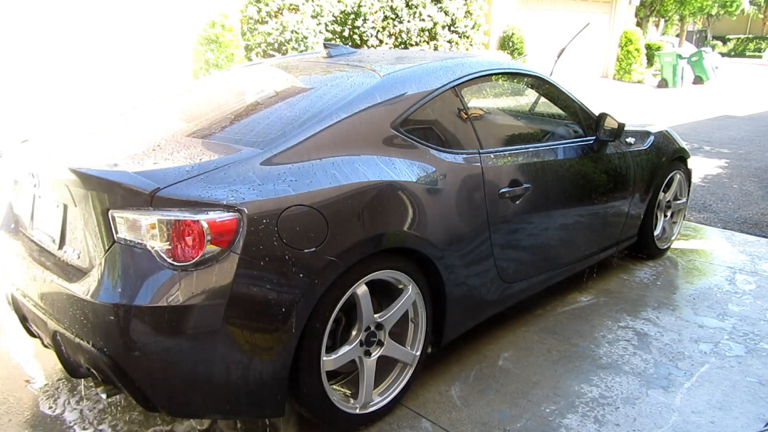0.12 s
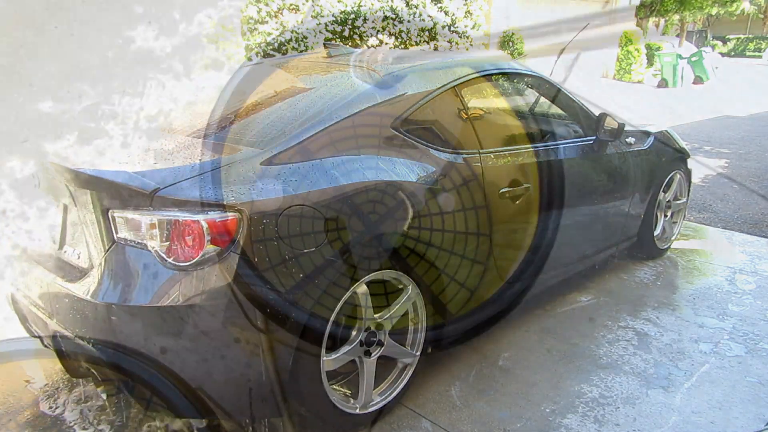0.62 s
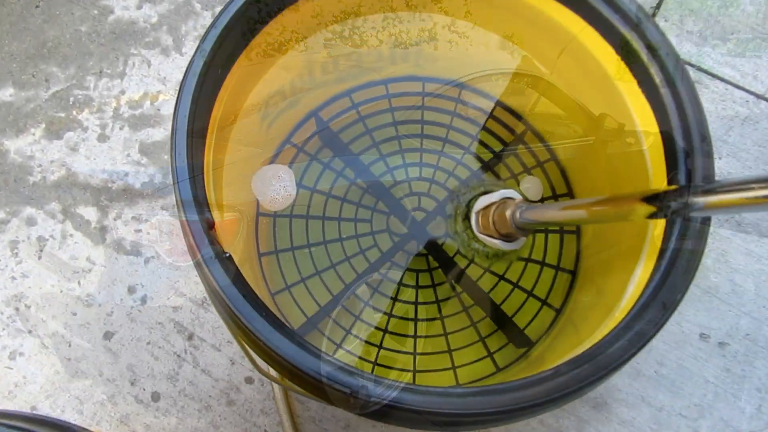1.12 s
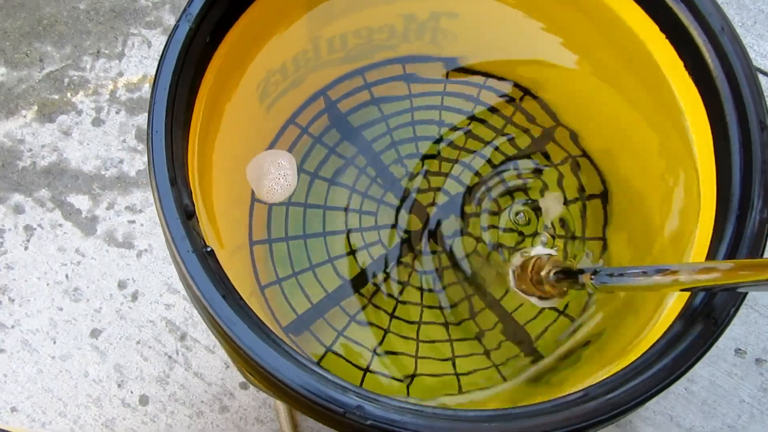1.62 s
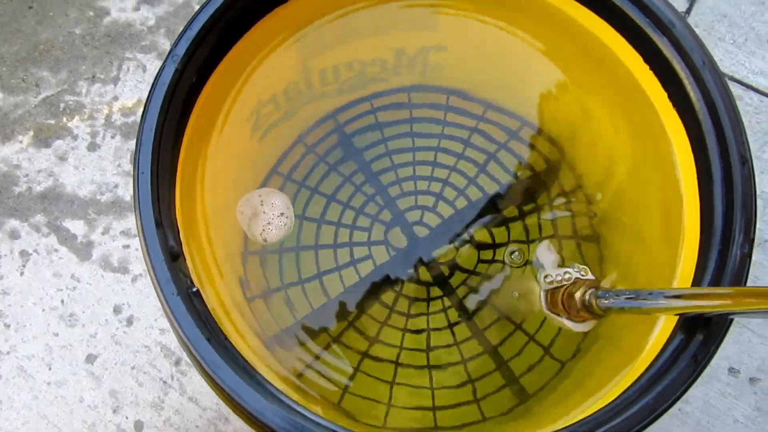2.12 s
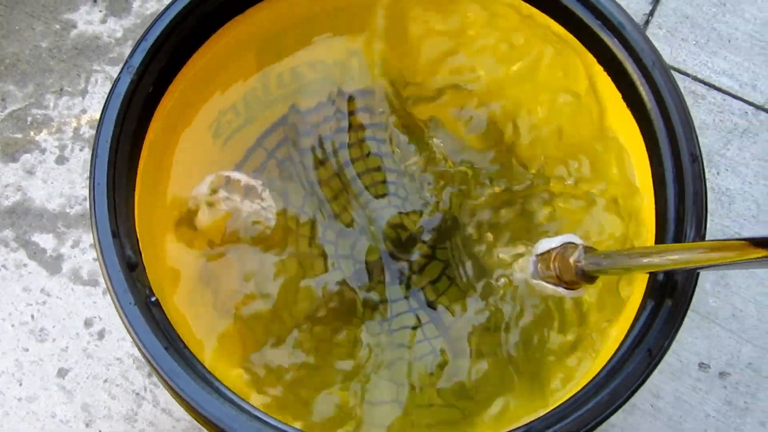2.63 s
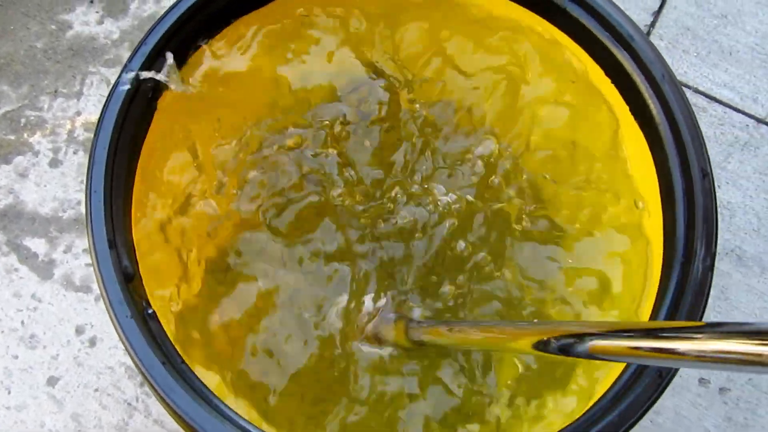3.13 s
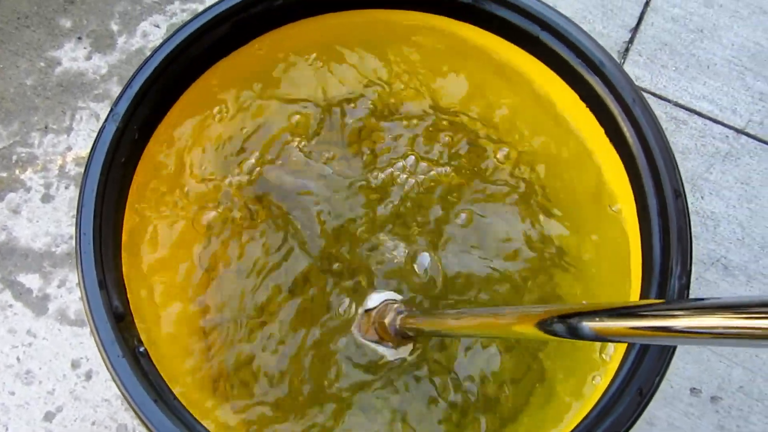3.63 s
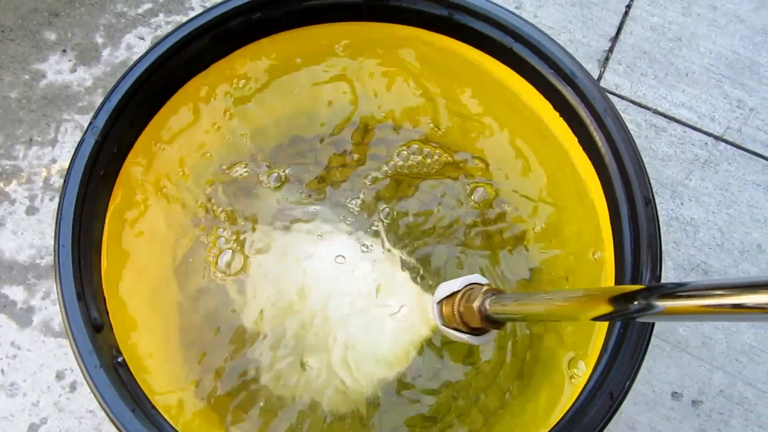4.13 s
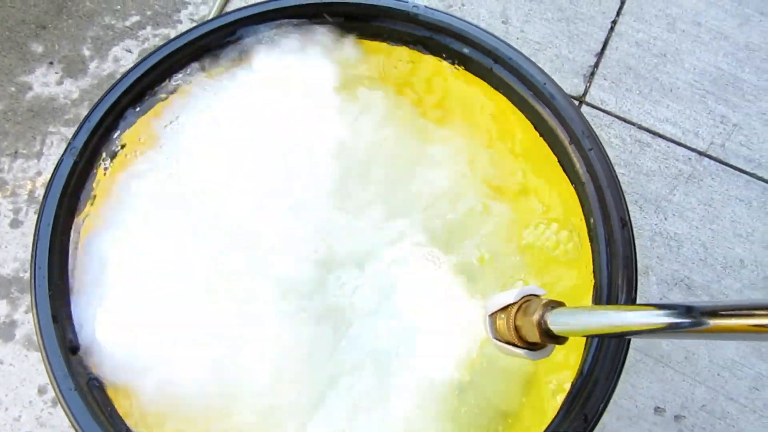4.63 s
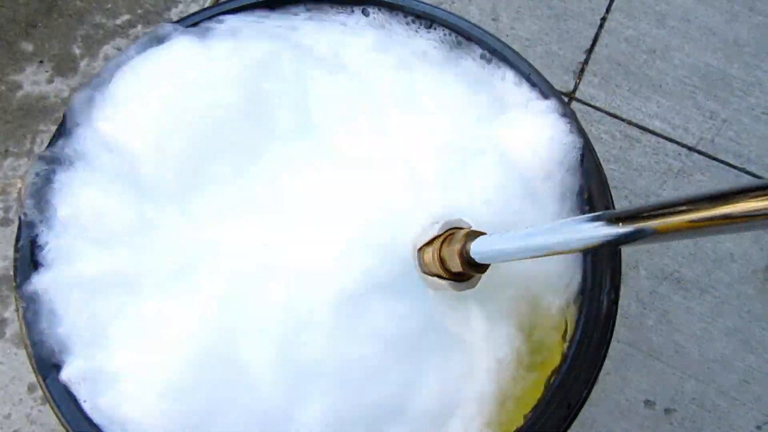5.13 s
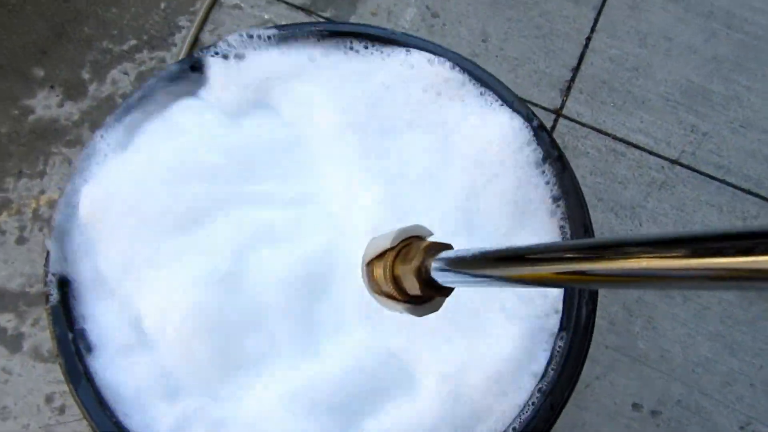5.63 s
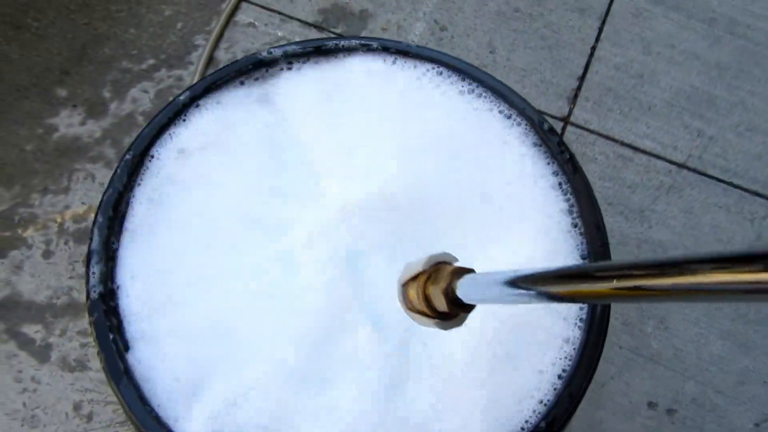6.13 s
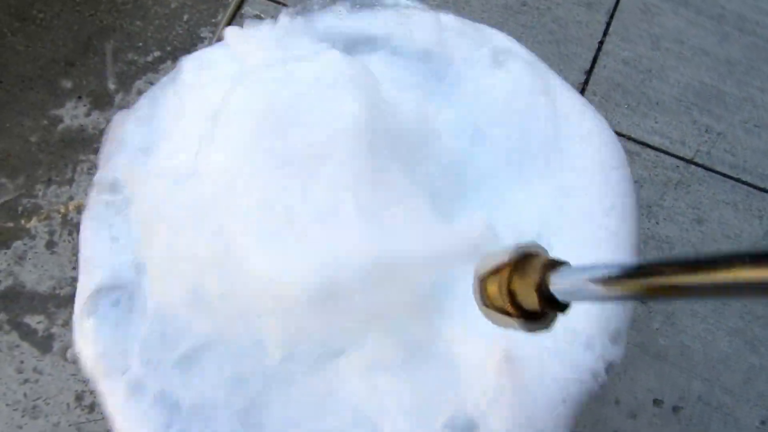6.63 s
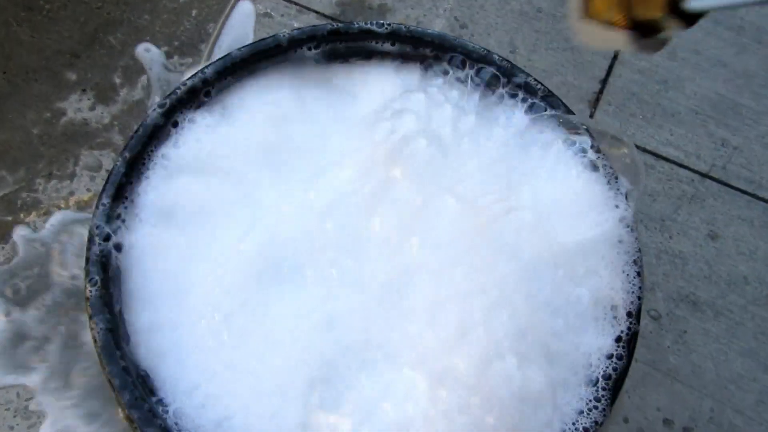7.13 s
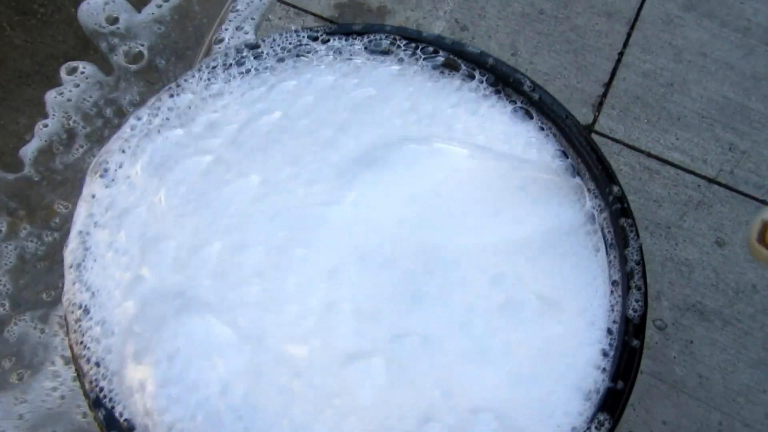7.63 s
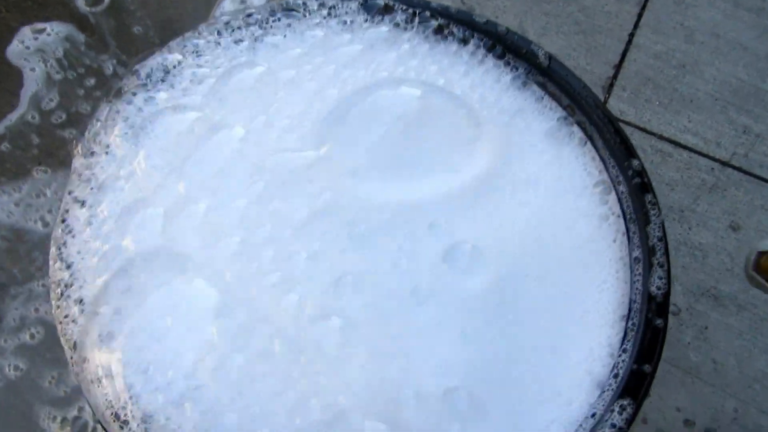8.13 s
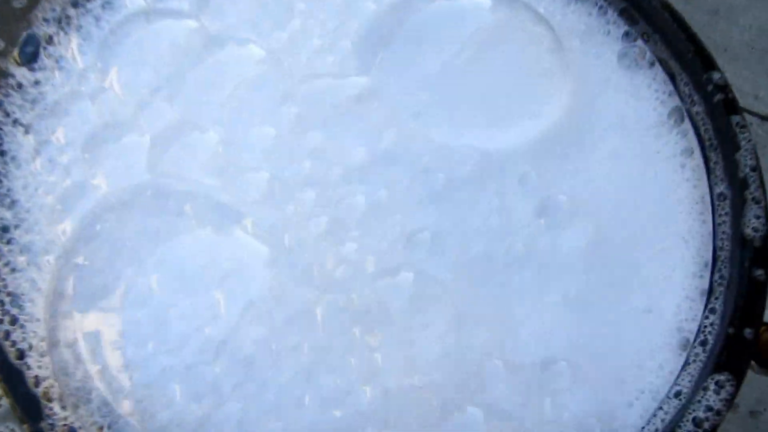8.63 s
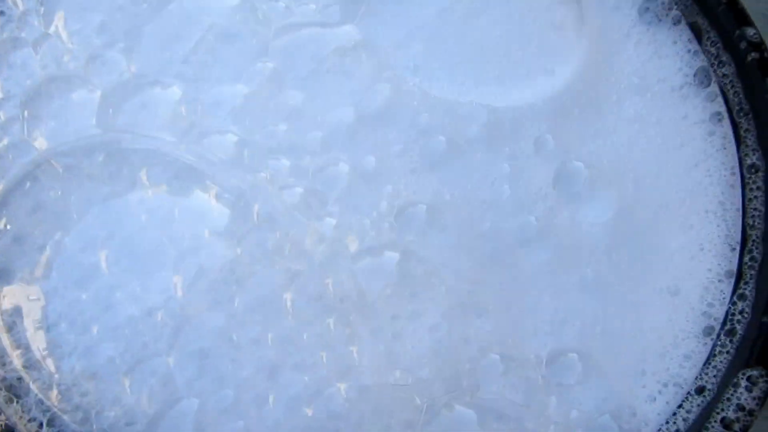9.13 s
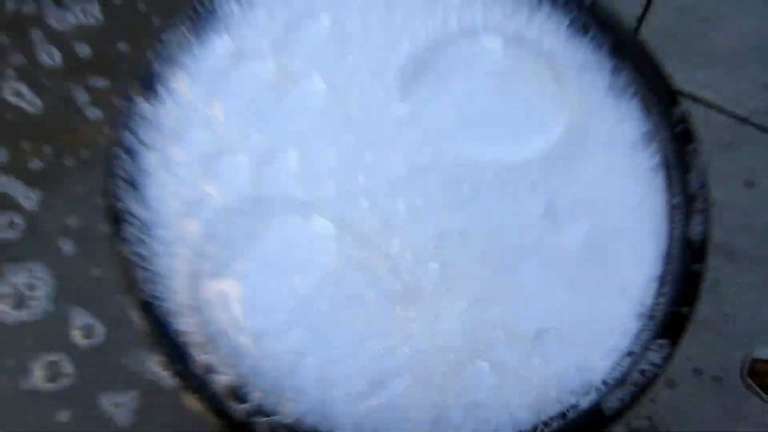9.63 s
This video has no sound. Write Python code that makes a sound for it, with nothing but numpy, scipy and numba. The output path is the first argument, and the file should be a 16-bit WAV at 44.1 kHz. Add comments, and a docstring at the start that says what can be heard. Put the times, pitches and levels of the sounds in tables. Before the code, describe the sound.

Close outdoors, a pressure washer jet churns and splashes in a bucket in short bursts, motor whine sliding lower between, ending in faint foam crackle.

```python
"""An electric pressure washer heard close on a paved yard: a first wash fades out, then the lance fires bursts
into a soapy bucket. Pump strokes ring the casing and gear teeth whine; after each burst the motor coasts down
and the whine slides lower. The jet is shaped noise, combed by its echo off the water. Knocks on the microphone,
popping foam (short damped rings and filtered clicks) and a humming suburban background fill the gaps."""
import sys
import numpy as np
from scipy import signal
from scipy.fft import rfft, irfft
from scipy.io import wavfile
from scipy.ndimage import uniform_filter1d, map_coordinates
from numba import njit

SR = 44100
rng = np.random.default_rng(int(sys.argv[2]) if len(sys.argv) > 2 else 0)


def magnitude_from_level(level_db):
    """Linear magnitude for a level in decibels (20 dB per decade)."""
    exponent = np.asarray(level_db, float) / 20
    return 10 ** exponent


def digitize_waveform(pressure):
    """Quantize a signal to 16-bit integers and store it at the path in sys.argv[1].

    Rows of a 2-D input are taken as channels; values are limited to [-1, 1].
    """
    field = np.atleast_2d(pressure).T
    bounded = np.clip(field, -1, 1)
    quanta = np.round(bounded * 32767).astype(np.int16)
    wavfile.write(sys.argv[1], SR, quanta)


N = 430857
T = np.arange(N) / SR  # time in s

# Casing resonances: pitch_hz, width_hz, relative_db
CASING = [(243.7, 66, -8.5), (337, 19, -1.5), (432.4, 42, 1.5), (581, 37, -2.5), (700, 112, -7),
          (966, 160, -7.5), (1460, 200, -16.5), (1990, 140, -26), (2774, 190, -14), (5460, 190, -13),
          (7240, 820, -23), (11030, 740, -42)]
# Gear whine: multiple of the tooth rate, relative_db
GEAR_TONES = [(1, 1), (2, .5), (3, -8), (4, -9), (5, -11), (6, -15)]
# Panels the gear whine rings most: pitch_hz, width_hz, relative_db
GEAR_PANELS = [(600, 100, -2), (2790, 200, -9), (5400, 260, -6)]
# Panel that sings when a hum tone sags onto it: pitch_hz, width_hz, relative_db
HUM_PANEL = [(432, 22, 11)]
# Stroke-rate multiples from the fifth up, in the first wash: relative_db
WASH_STROKES = [-39, -33, -33, -29, -34, -36, -41, -41, -36, -36, -44, -41, -40, -48, -38, -39, -41]
# The same multiples under load at the bucket: relative_db
LOAD_STROKES = [-6, 0, 0, -11, -9, -6, -9, -3, -4, -11, -5]
# Clean gear lines of the first wash: pitch_hz, relative_db
WASH_WHINE = [(1340, -30.5), (2686, -35.5), (2789, -34.5), (5313, -31)]
# Spray colour in the first wash: pitch_hz, relative_db (per Hz)
WASH_SPRAY = [(35, -50), (60, -15), (160, -17), (400, -2.5), (591, -6.5), (1360, -7.5), (2360, -11.5),
              (3750, -14), (5430, -13), (15000, -19)]
# Motor runs: power_on_s, power_off_s, whirr_db, load_hum_db
RUNS = [(1.376, 2.87, -31, -38.5), (3.635, 5.283, -35.5, -42), (6.247, 6.8, -29.5, -42)]
# Speed of each run: share of the usual speed
RUN_SPEED = [1, 1, .975]
# Usual spin-up, then a sag as pressure builds: after_start_s, strokes_hz
SPIN_UP = [(0, 32), (.09, 52), (.27, 52.5), (.43, 56.3), (.57, 56.9), (.74, 56.7), (.9, 55.7), (1.4, 54.6),
           (1.65, 54.3)]
# Jet stages, the third from when the nozzle breaks the surface:
# start_s, end_s, echo strength (0-1), splash_db (against the underwater part of the jet)
JET_STAGES = [(1.351, 2.809, .62, -6), (3.551, 4.002, .55, -9), (4.002, 5.224, .15, -5),
              (6.211, 6.671, .1, -4)]
# Lance within each stage: time_s, jet_db, share spraying in air (0-1), churning (about 1 is full)
LANCE = [
    [(1.376, -22, 0.53, 0), (1.385, -27.5, 0.44, 0.9), (1.47, -22.5, 0.7, 0.6), (1.6, -15.5, 0.43, 1.1),
     (1.76, -18, 0.12, 0.6), (1.9, -15.5, 0.25, 0.15), (2.2, -17.5, 0.09, 0.1), (2.23, -21.5, 0.1, 0),
     (2.5, -17.5, 0.11, 0), (2.8, -17, 0.03, 0.03)],
    [(3.56, -27.5, 0.47, 0), (3.62, -32.5, 0.47, 0.07), (3.75, -25, 0.2, 0.1), (3.81, -23.5, 0.16, 0.38),
     (3.98, -19, 0.02, 0.47)],
    [(4.01, -10.5, 0.94, 0.04), (4.12, -12.5, 0.99, 0.06), (4.18, -20.5, 0.8, 0.14),
     (4.26, -22.5, 0.67, 0.33), (4.57, -17.5, 0.73, 0.3), (4.74, -17.5, 0.5, 0.6), (4.85, -13.5, 0.41, 0.2),
     (4.98, -20, 0.26, 0.27), (5.03, -17, 0.82, 0), (5.08, -17.5, 0.78, 0.24), (5.16, -13, 0.9, 0.14),
     (5.22, -16.5, 0.91, 0.01)],
    [(6.22, -26, 0.56, 0.05), (6.27, -31, 0.48, 0.19), (6.44, -23.5, 0.53, 0.1), (6.66, -17.5, 0.39, 0.5)],
]
# Extra path of the echo off the water as the nozzle moves: time_s, path_cm
DETOUR = [(1.35, 13.6), (1.7, 13), (2.05, 13.6), (2.3, 15.4), (2.6, 16.3), (2.81, 16.5), (3.55, 8.6),
          (3.72, 9.9), (3.82, 11.7), (4.0, 13.2), (4.02, 7), (4.75, 7), (4.95, 8.3), (5.22, 6.5)]
# Bucket resonances: pitch_hz, width_hz, relative_db
BUCKET = [(978, 370, -0.5), (1139, 53, 13), (1590, 178, 8.5), (1764, 250, 6), (2260, 45, 4.5),
          (2670, 49, 1), (2770, 380, 1.5)]
# Air pockets dragged under by the jet: start_s, end_s, from_hz, to_hz, level_db
POCKETS = [(1.46, 1.83, 9900, 8000, -23), (1.41, 1.71, 458, 420, -21), (1.8, 1.9, 1670, 1660, -30),
           (1.52, 2.08, 1234, 1140, -27.5), (1.8, 2.6, 6700, 4850, -27), (2.05, 2.92, 3700, 3180, -25),
           (2.6, 2.9, 5000, 6000, -26.5), (3.68, 4.02, 5300, 3800, -22), (3.72, 3.87, 2280, 2250, -23.5),
           (3.777, 4.08, 1940, 1850, -17.5), (3.814, 4.08, 2720, 2240, -17.5),
           (4.784, 4.97, 2150, 2030, -23), (4.764, 4.95, 3500, 3100, -30), (4.66, 4.82, 445, 415, -27)]
# Valve and surface cracks: start_s, level_db
SNAPS = [(1.3525, 1.5), (3.552, -16.5), (4.0037, -8), (6.2114, -9)]
# Large bubbles ringing: start_s, level_db, pitch_hz
GULPS = [(2.735, -14, 937), (2.76, -15, 1010), (8.43, -44, 1130)]
# Foam and drip ticks: start_s, level_db, pitch_hz
TICKS = [(1.288, -32, 5270), (1.3, -28, 9000), (1.308, -24, 5750), (1.334, -33, 7960), (2.955, -34, 9500),
         (3.1496, -35, 11000), (3.2469, -36, 10500), (3.277, -40, 3900), (6.0605, -50, 6360),
         (6.096, -48, 4630), (7.2083, -32, 5460), (7.613, -46, 5600), (8.8059, -47.5, 7870)]
# Hand knocks on the microphone: start_s, level_db, pitch_hz
KNOCKS = [(1.219, -22, 95.5), (1.251, -18, 75), (1.28, -14.5, 126), (7.561, -39, 57), (7.627, -31, 83.5),
          (7.794, -35, 84.5)]
# Background colour: pitch_hz, relative_db (per Hz)
YARD = [(15, -39), (25, -6), (121, -3.5), (354, -10), (573, -10), (709, -14.5), (1120, -17), (2180, -20.5),
        (2430, -23.5), (3090, -29), (15000, -46)]
# Narrow background drones: pitch_hz, width_hz, relative_db
YARD_DRONES = [(567, 7, -14), (1070, 30, -25.5), (2014, 25, -21), (2462, 35, -15)]
# Background level over time: time_s, level_db
YARD_LEVEL = [(0, -44.5), (1.3, -36.5), (1.9, -46.5), (3.5, -52), (6.099, -55.5), (7.0, -47), (8.2, -49.5),
              (9.2, -44.5), (9.77, -41.5)]

WASH_STROKE_HZ = 53.83
WASH_DB, WASH_SWELL_DB = -15.5, -1.5  # level, and how far from it the wash begins
FADE_FROM_S, FADE_TO_S, FADE_POWER = 0.28, 1.289, 0.78
TEETH = 49.9  # gear tooth contacts per pump stroke
COAST_S = .55  # time constant of the coast-down
BITE_S = 0.093  # time from power on to full voice
STALL, STALL_RAMP = 0.081, 0.034  # shares of full speed: silent below the first, fading in over the second
CHURN_DB, SLOSH_DB = -22.5, -30.5  # full churning, and the splash from it
POCKET_Q = 12.  # final pitch over width
HUM_HZ, HUM_DB = 117.8, -4.5  # background hum: middle pitch, and level against the background


@njit
def svf(x, hz, width):
    """State-variable band-pass with a moving centre, gain 1 at the centre."""
    y, b, l = np.empty(len(x)), 0., 0.
    for i in range(len(x)):
        g, k = np.tan(np.pi * hz[i] / SR), width / hz[i]
        v = (b + g * (x[i] - l)) / (1 + g * (g + k))
        b, l, y[i] = 2 * v - b, l + 2 * g * v, k * v
    return y


def band(x, lo_hz, hi_hz):
    """Band-pass."""
    return signal.sosfilt(signal.butter(2, [lo_hz, hi_hz], "bandpass", fs=SR, output="sos"), x)


def rings(x, modes):
    """Sum of fixed resonances (pitch_hz, width_hz, level_db), neighbours in opposite phase."""
    out = 0
    for k, (hz, width, db) in enumerate(modes):
        out = out + (-1) ** k * magnitude_from_level(db) * signal.lfilter(*signal.iirpeak(hz, hz / width, SR), x)
    return out


def unit(x):
    """Scale to rms 1."""
    return x / np.std(x)


def walk(rate):
    """Random levels drawn rate times a second, smoothed twice; spread near 1."""
    k = int(SR / rate)
    held = np.repeat(rng.standard_normal(N // k + 1), k)
    return 1.51 * uniform_filter1d(uniform_filter1d(held, k), k)[:N]


def coloured(spectrum):
    """Noise of rms 1 shaped by (pitch_hz, level_db) points."""
    hz, db = np.transpose(spectrum)
    f = np.arange(N // 2 + 1) * SR / N + 1
    shape = magnitude_from_level(np.interp(np.log(f), np.log(hz), db))
    return unit(irfft(rfft(rng.standard_normal(N)) * shape, N))


def droplets(spread_db):
    """Noise whose samples scatter widely in size, like many small impacts."""
    return rng.standard_normal(N) * magnitude_from_level(spread_db * np.minimum(rng.exponential(size=N), 6))


def pump(hz, scatter_db):
    """Pump phase in turns, and one blow per stroke ringing the casing; rms near 1 at the first wash's rate."""
    turns = np.cumsum(hz) / SR
    whole = turns.astype(int)
    size = magnitude_from_level(scatter_db * rng.standard_normal(N // 200))
    one_blow = rings(signal.unit_impulse(SR), CASING)
    blows = rings(np.diff(whole, prepend=0) * size[whole], CASING)
    return turns, blows / np.sqrt(WASH_STROKE_HZ * np.mean(one_blow ** 2))


def strokes(turns, levels_db):
    """Clean hum of the pump: multiples of the stroke rate from the fifth up, each wavering a little."""
    out = np.zeros(N)
    for k, db in enumerate(levels_db):
        tone = np.sin(2 * np.pi * ((5 + k) * turns + rng.random()))
        out += np.sqrt(2) * magnitude_from_level(db + 1.5 * walk(8)) * tone
    return out


def first_wash():
    """Steady pump strokes in the casing, clean gear lines and a broad spray, swelling a little, then fading."""
    left = np.clip((FADE_TO_S - T) / (FADE_TO_S - FADE_FROM_S), 0, 1)
    swell_db = WASH_SWELL_DB * np.clip(1 - T / FADE_FROM_S, 0, 1)
    turns, blows = pump(np.full(N, WASH_STROKE_HZ), 0.27)
    whine = np.zeros(N)
    for hz, db in WASH_WHINE:
        tone = np.sin(2 * np.pi * hz * T + 0.19 * walk(21.5))
        whine += np.sqrt(2) * magnitude_from_level(db + 1.4 * walk(20.4)) * tone
    spray = coloured(WASH_SPRAY) * magnitude_from_level(0.5 * walk(10.2))
    mix = magnitude_from_level(-8) * band(blows, 2000, 9000) + magnitude_from_level(17.5) * strokes(turns, WASH_STROKES)
    mix = mix + magnitude_from_level(14.5) * whine + magnitude_from_level(-2.0) * spray
    return mix * magnitude_from_level(WASH_DB + swell_db) * left ** FADE_POWER


def motor_runs():
    """Stroke rate, share of speed left, whirr gain and hum gain: each run spins up, then drag slows it."""
    speed, spin, gain, load = np.zeros((4, N))
    for (on, off, db, load_db), share in zip(RUNS, RUN_SPEED):
        t = T[T >= on]
        here = slice(N - len(t), N)
        bite = np.minimum((t - on) / BITE_S, 1)
        # drag that grows with speed plus a little dry friction
        coast = np.maximum(1.15 * np.exp(-np.maximum(t - off, 0) / COAST_S) - .15, 0)
        speed[here] = np.interp(np.minimum(t, off) - on, *np.transpose(SPIN_UP)) * coast * share
        spin[here] = coast
        gain[here] = magnitude_from_level(db) * np.clip((coast - STALL) / STALL_RAMP, 0, 1) * bite
        load[here] = magnitude_from_level(load_db) * (t < off) * bite
    return speed, spin, gain, load


def gear_whine(turns, spin):
    """Gear teeth ring the casing; each stroke brakes the slowing rotor, so the whine falls in steps and throbs."""
    teeth = TEETH * (turns + .1 * (1 - spin) * np.sin(2 * np.pi * turns) / (2 * np.pi))
    gear = np.zeros(N)
    for k, db in GEAR_TONES:
        tone = magnitude_from_level(2 * walk(45)) * np.sin(2 * np.pi * k * teeth + .7 * walk(200))
        gear += magnitude_from_level(db) * spin ** (.18 * (k - 1)) * tone  # upper multiples fade first
    gear *= 1 + (.35 + .6 * (1 - spin) ** 2) * np.cos(2 * np.pi * turns)
    casing = magnitude_from_level(-6.0) * band(band(rings(gear, CASING), 520, 9000), 520, 9000)
    panels = sum(rings(gear, [panel]) for panel in GEAR_PANELS)
    past_casing = .22 * band(gear, 700, 7400)  # the share that bypasses the casing
    return casing - panels + past_casing


def brush_rattle(turns):
    """Brush noise, strongest at the start of each stroke, rings the casing and is also heard directly."""
    brushes = droplets(1.5) * (4.5 + np.exp(-(turns % 1) / .5))
    in_casing = magnitude_from_level(0.5 + 2.0 * walk(35)) * unit(rings(brushes, CASING))
    direct = magnitude_from_level(-6.0) * unit(band(brushes, 700, 2700))
    fizz = magnitude_from_level(-20.5) * unit(band(droplets(1.13), 5300, 12000))
    return in_casing + direct + fizz


def motor():
    """The powered motor hums under load; strokes, gear teeth and brushes sound on as it coasts."""
    speed, spin, gain, load = motor_runs()
    turns, blows = pump(speed, .2)
    # the pressure switch cuts the power at the top of a stroke
    for on, off, *_ in RUNS:
        turns = np.where(T >= on, turns - turns[int(off * SR)], turns)
    # the pistons push softly, so only the lowest casing tones sing
    blows = magnitude_from_level(-3.5) * rings(blows, [(348, 100, 6.6), (689, 180, 3.5)])
    hum = load * strokes(turns, LOAD_STROKES)
    whirr = spin ** 1.25 * (blows + brush_rattle(turns)) + spin ** .6 * gear_whine(turns, spin)
    return hum + rings(hum, HUM_PANEL) + gain * whirr


def echo_off_water(direct, mirror):
    """Subtract the delayed jet noise, which cuts comb-like notches that slide as the nozzle moves."""
    path_cm = np.interp(T, *np.transpose(DETOUR))
    # ripples shake the echo path and scatter its bass and treble
    lag = SR * path_cm / 34300 * (1 + .02 * walk(20))  # in samples
    echo = map_coordinates(direct, [np.arange(N) - lag], order=3)
    echo = signal.filtfilt(*signal.butter(1, [2300, 10000], "bandpass", fs=SR), echo)
    return (direct - mirror * echo) / np.sqrt(1 + mirror ** 2)


def jet():
    """Churning water, splash, bucket ring, roar and nozzle hiss; roar and hiss are combed by the echo."""
    columns = np.ones((3, N))
    gate, strength, splash_db = np.zeros((3, N))
    for (on, off, *stage), rows in zip(JET_STAGES, LANCE):
        s, *values = np.transpose(rows)
        gate[(T >= on) & (T < off)] = 1
        columns[:, T >= on] = [np.interp(T[T >= on], s, v) for v in values]
        strength[T >= on], splash_db[T >= on] = stage
    jet_db, in_air, churning = columns
    in_air, churning = np.clip(in_air, 0, 1), np.maximum(churning, 0)
    under = magnitude_from_level(jet_db) * np.sqrt(1 - in_air)
    spit = magnitude_from_level(.8 * walk(70) + .7 * walk(250) + .9 * in_air * walk(18))

    churn = unit(band(band(droplets(2.7), 200, 710), 200, 710))
    churn = churn * churning ** 1.26 * magnitude_from_level(CHURN_DB + 1.1 * walk(40))
    churn = churn + unit(band(droplets(1), 65, 150)) * churning * in_air * magnitude_from_level(-40)

    drops = droplets(2.4)
    # clear water reflects and lets the bucket ring; foam damps both
    ring = 2.4 * strength * unit(rings(drops, BUCKET)) * magnitude_from_level(1.6 * walk(20))
    splash = unit(band(band(drops, 580, 2080), 680, 2160)) + ring
    splash = splash / np.hypot(1, 1.22 * strength) * magnitude_from_level(0.555 * walk(30))
    splash = splash * np.hypot(under * magnitude_from_level(splash_db), churning * magnitude_from_level(SLOSH_DB))

    roar = unit(band(drops, 2000, 4780)) * under * magnitude_from_level(-1.0 + 1.0 * walk(30))
    air = droplets(0.97)
    hiss = unit(unit(band(air, 3500, 12500)) + .5 * unit(band(air, 5977, 10630)))
    hiss = hiss * np.sqrt(in_air) * magnitude_from_level(jet_db + 0.49 * walk(29))
    # a churned, rippling surface scatters the echo
    mirror = np.clip(strength * (1 - .75 * churning) * (1 + .2 * walk(15)), 0, 1)
    combed = echo_off_water(roar + hiss, mirror)
    # the flow starts and stops within a few milliseconds
    gate = signal.lfilter([.02], [1, -.98], gate)
    return gate * spit * (churn + splash + combed + pockets(drops))


def pockets(drops):
    """Each air pocket swells and fades while its pitch slides; it dies with the stage of the jet that made it."""
    out = np.zeros(N)
    for on, off, from_hz, to_hz, db in POCKETS:
        here = slice(int(on * SR), int(off * SR))
        hz = np.linspace(from_hz, to_hz, here.stop - here.start)
        stage_end = min(end for _, end, *_ in JET_STAGES if end > on)
        ring = unit(svf(drops[here], hz, to_hz / POCKET_Q))
        out[here] += magnitude_from_level(db) * ring * np.sqrt(np.hanning(len(hz))) * (T[here] < stage_end)
    return out


def blips(events, cycles, noisy):
    """Short rings (start_s, level_db, pitch_hz), partly noise, dying away over the given number of cycles."""
    out = np.zeros(N)
    for s, db, hz in events:
        start = int(s * SR)
        t = np.arange(min(4000, N - start)) / SR
        ring = np.sin(2 * np.pi * hz * t) + noisy * rng.standard_normal(len(t))
        out[start:start + len(t)] += magnitude_from_level(db) * ring * np.exp(-t * hz / cycles)
    return out


def snaps():
    """Valve and surface cracks: a noisy high click over a weaker, longer ring."""
    click = blips([(s, db, 4300) for s, db in SNAPS], 1.7, 0.61)
    return click + blips([(s, db - 19.5, 2300) for s, db in SNAPS], 12.5, 0)


def small_sounds():
    """Ringing bubbles, noisy foam and drip ticks, and dull knocks on the microphone, all damped rings."""
    ticks = band(blips(TICKS, 12.0, 1.65), 2500, 9200)
    return ticks + blips(KNOCKS, 1.7, 0.016) + blips(GULPS, 22., .03)


def foam():
    """Sparse faint bubbles bursting on the settled foam: random clicks, about 40 a second after 5.3 s."""
    pops = (rng.random(N) < 40 / SR) * magnitude_from_level(4.5 * rng.standard_normal(N)) * (T > 5.3)
    return magnitude_from_level(-44) * band(pops, 3500, 9000)


def yard():
    """Distant traffic as shaped noise, a wavering mains hum, a few narrow drones and gusty low rumble."""
    level_db = np.interp(T, *np.transpose(YARD_LEVEL))
    traffic = coloured(YARD) * magnitude_from_level(0.9 * walk(2.894))
    drones = sum(magnitude_from_level(db) * unit(rings(rng.standard_normal(N), [(hz, width, 0)]))
                 for hz, width, db in YARD_DRONES)
    hum = np.sqrt(2) * np.sin(2 * np.pi * HUM_HZ * T + 0.86 * walk(4.4))
    hum = hum * magnitude_from_level(HUM_DB + 1.6 * walk(3)) * magnitude_from_level(np.minimum(level_db, -45))
    rumble = magnitude_from_level(-22.5 + 1.5 * walk(5.9)) * unit(band(rng.standard_normal(N), 25, 90))
    return (traffic + drones + rumble) * magnitude_from_level(level_db) + hum


def scene():
    """Everything reaches one microphone, heard alike on both channels."""
    mix = first_wash() + motor() + jet() + snaps() + small_sounds() + foam() + yard()
    return np.array([mix, mix])


def low_pass(x):
    """Removes everything above the highest recorded frequency."""
    return signal.sosfilt(signal.butter(12, 16130, fs=SR, output="sos"), x)


def record(dry):
    """The loudest peaks are rounded and the treble above 15.1 kHz is cut."""
    rounded = np.tanh(0.58 * dry) / 0.62
    top = signal.ellip(8, .2, 70, 15100, fs=SR, output="sos")
    return low_pass(signal.sosfilt(top, rounded))


dry = scene()
out = record(dry)
digitize_waveform(out)
```